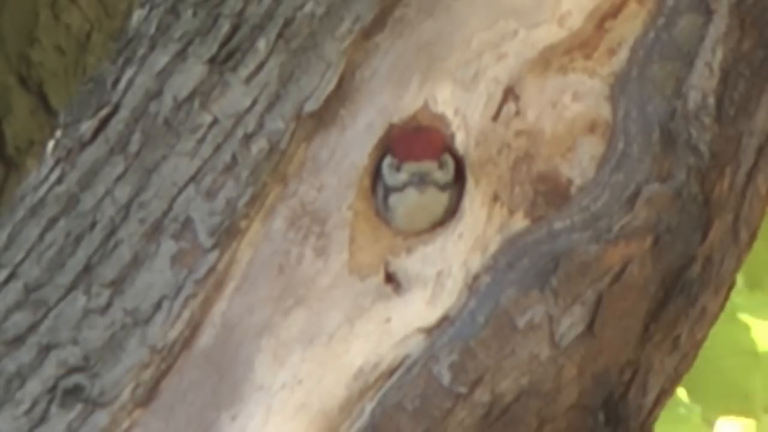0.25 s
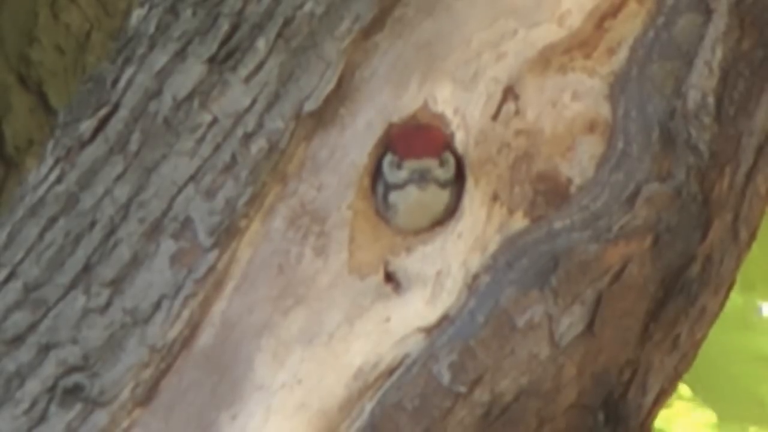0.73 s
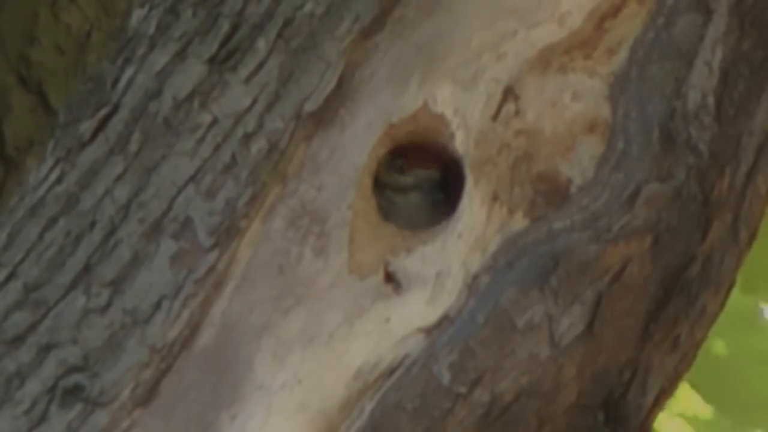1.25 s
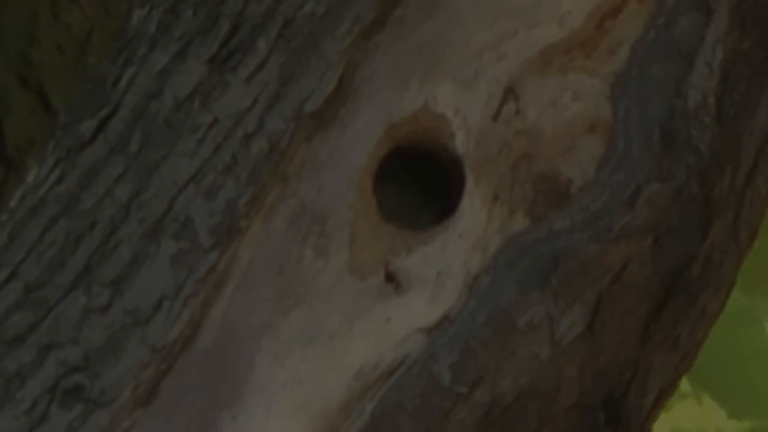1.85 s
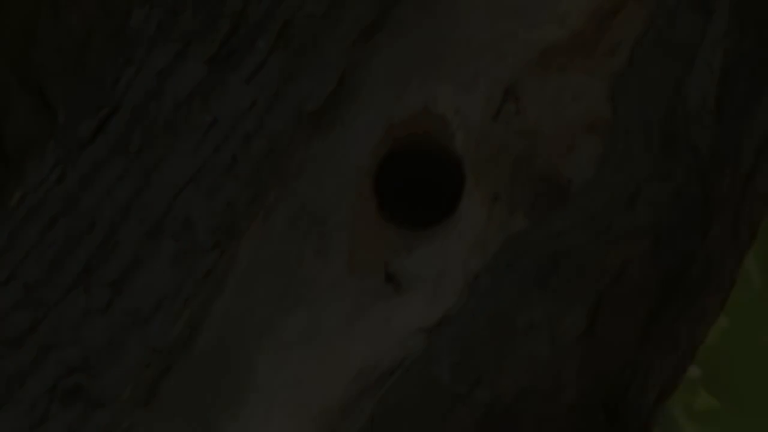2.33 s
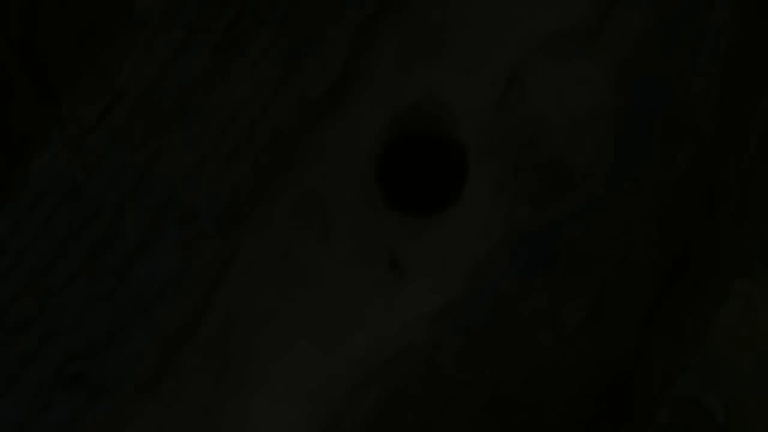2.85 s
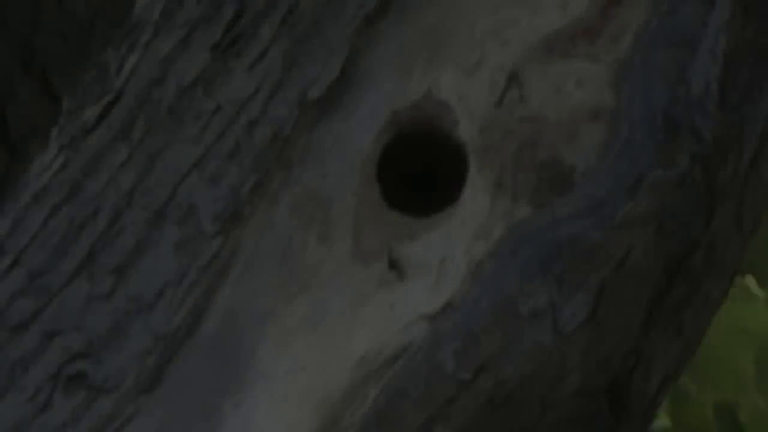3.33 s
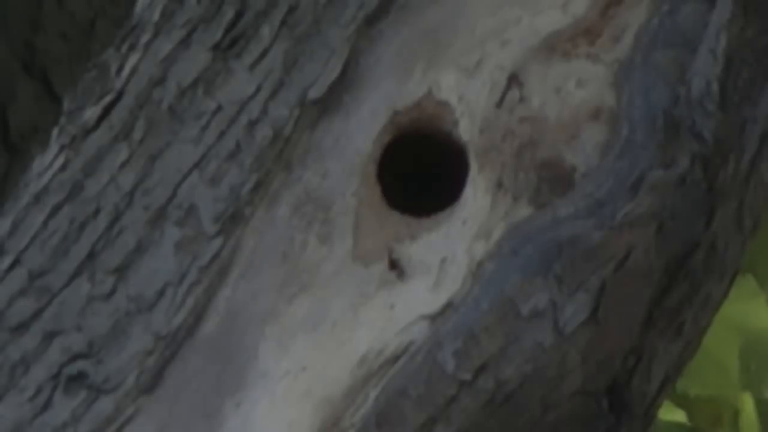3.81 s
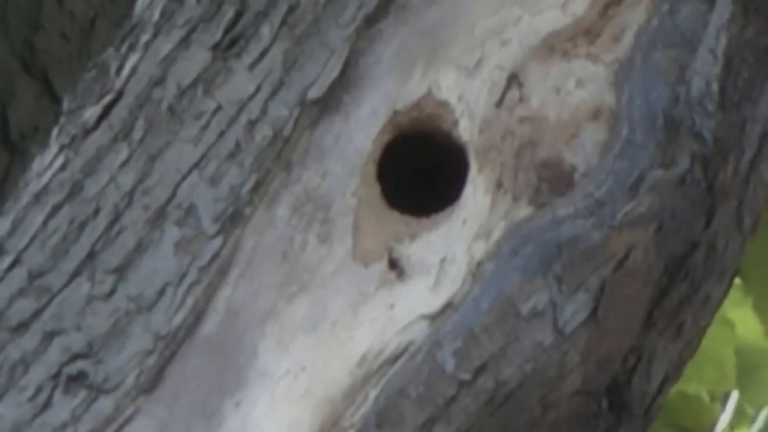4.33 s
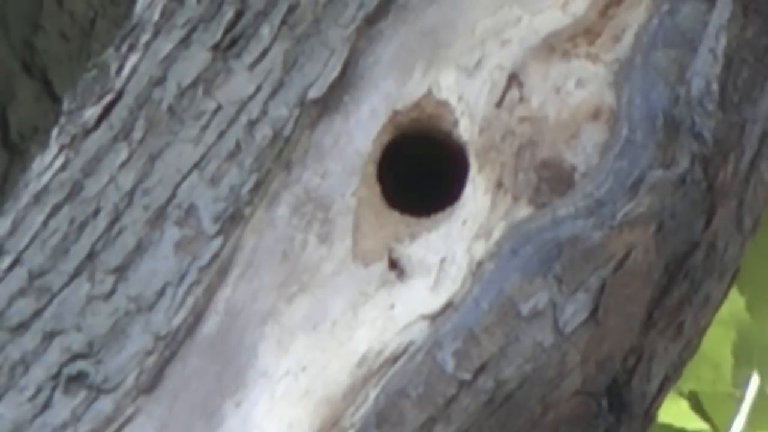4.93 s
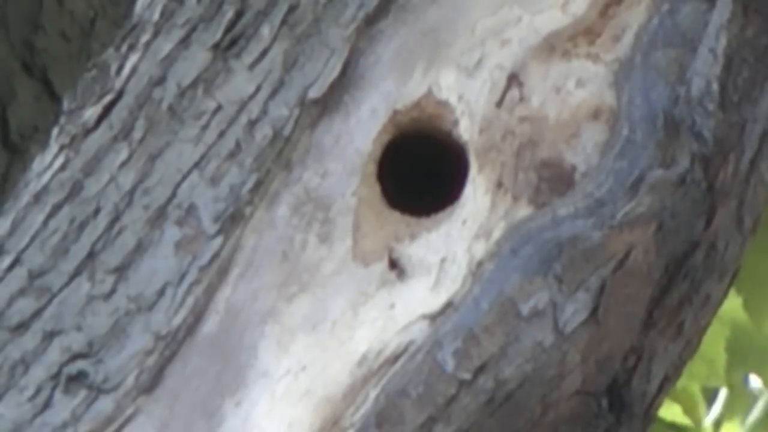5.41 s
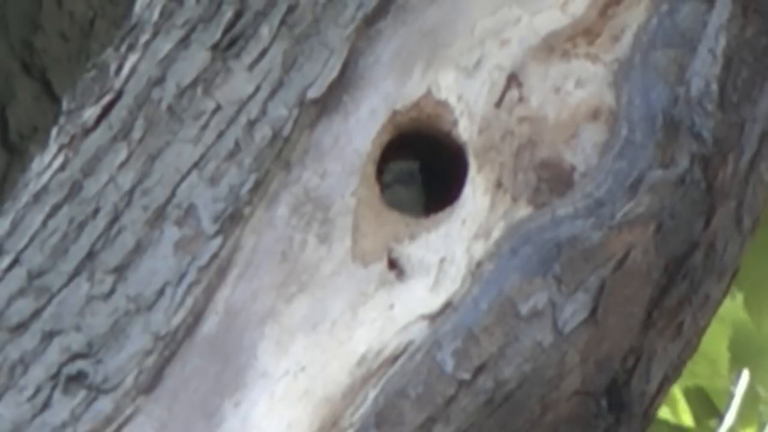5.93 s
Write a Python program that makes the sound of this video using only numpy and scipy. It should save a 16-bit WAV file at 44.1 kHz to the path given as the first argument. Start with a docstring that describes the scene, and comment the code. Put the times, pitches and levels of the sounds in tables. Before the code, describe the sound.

An echoing wood around a woodpecker nest hole, heard in stereo for about six seconds. At once a warbler repeats a rapid gliding phrase four times until 0.8 s, with mellow thrush whistles, quick chirps, trills and thin seeps near 0.7 and 0.9. The chick gives bright, raspy chips of about 30 milliseconds at 0.1, 1.0, 1.5, 1.6 and 2.0 s, each echoing briefly. Clear piping notes come at 1.4-1.8. Leaf hiss, far traffic and a faint low drone lie beneath, all fading gradually to silence at 2.8. A second shot then fades in without the drone: duller, deeper chips at 3.3, 4.1, 4.6 and 5.9, with very faint soft ones near 5.4 and 6.0. Thrush whistles cluster at 3.4-4.0 and 4.5-4.9, with sparse faint pipes after. Wind rumbles and flutters on the microphone, strongest from 3.7 to 5.4, with a low thump at 4.6, then eases.

```python
"""An echoing wood, at a nest hole: a woodpecker chick gives short arched calls, built from harmonics and breath
noise. Thrush whistles and small songbirds are gliding near-sine notes with a random-noise echo. Shaped noise
makes far traffic, leaves and wind rumbling in the microphone; a wavering sine drones low in the first shot.
Two shots follow each other: the first fades out, the second fades in."""
import sys
import numpy as np
from scipy import signal
from scipy.fft import rfft, irfft, next_fast_len
from scipy.io import wavfile
from scipy.ndimage import uniform_filter1d, map_coordinates

SR = 44100
rng = np.random.default_rng(int(sys.argv[2]) if len(sys.argv) > 2 else 0)


def dump(signal):
    """Clip the signal to [-1, 1] and save it as 16-bit WAV at the path in sys.argv[1]."""
    limited = np.clip(np.atleast_2d(signal).T, -1, 1)
    pcm = np.round(limited * 32767).astype(np.int16)
    wavfile.write(sys.argv[1], SR, pcm)


N = 271656
SHOT_CHANGE_S = 2.796


def amp(db):
    """dB to gain."""
    return 10 ** (np.asarray(db) / 20)


def unit(x):
    """Scaled to rms 1."""
    return x / np.sqrt(np.mean(x ** 2) + 1e-20)


def along(points, hz):
    """Interpolates (frequency [Hz], value) points on a log frequency axis."""
    point_hz, value = np.transpose(points)
    return np.interp(np.log(hz + 1), np.log(point_hz + 1), value)


def wobble(rate_hz, size=N):
    """Smooth random curve with rate_hz knots a second."""
    knots = rng.standard_normal(int(size * rate_hz / SR) + 4)
    return map_coordinates(knots, [np.arange(size) * rate_hz / SR])


def filtered(x, response):
    """Multiplies the spectrum of x by a response of frequency."""
    size = next_fast_len(N + 8192)  # zero padding keeps the end from wrapping round
    return irfft(rfft(x, size) * response(np.fft.rfftfreq(size, 1 / SR)), size)[..., :N]


def add(track, start_s, sound):
    """Mixes a sound into the track at start_s."""
    part = track[..., round(start_s * SR):][..., :sound.shape[-1]]
    part += sound[..., :part.shape[-1]]


def by_shot(first, second):
    """The first sound before the change of shot, the second after it."""
    return np.where(np.arange(N) < SHOT_CHANGE_S * SR, first, second)


def edges(size, attack_s):
    """Sine-squared start and end of a note."""
    t = np.arange(size) / SR
    return np.sin(np.pi / 2 * np.clip(np.minimum(t, t[::-1]) / attack_s, 0, 1)) ** 2


# decay of the echo among trunks: (frequency [Hz], t60 [s])
TREE_DECAY = [(1500, 0.54), (3000, 0.46), (6000, 0.49), (12000, 0.14)]


def trees(x, gap_s):
    """The wood's answer to a short sound: a new scatter of trunks each time, decaying by frequency."""
    hz, t, z = signal.stft(rng.standard_normal((2, SR // 2)), SR, nperseg=256)
    decay_db = -60 * t / along(TREE_DECAY, hz)[:, None]
    tail = signal.istft(z * amp(decay_db), SR, nperseg=256)[1]
    tail = tail[:1] + 0.43 * tail  # the near trunks are heard alike on both sides
    tail = tail / np.linalg.norm(tail[0])
    tail = np.pad(tail, ((0, 0), (round(gap_s * SR), 0)))
    return signal.fftconvolve(x[None], tail, axes=1)


def note(start_s, length_s, pitch_hz, shape_db, pan_db, echo_db, waver_hz, grain_db, trill=False):
    """Near-pure whistle gliding through three pitches and levels; a trill shakes regularly and pulses in level."""
    out = np.zeros((2, N))
    a_hz, b_hz, c_hz = pitch_hz
    size = round(length_s * SR)
    u = np.arange(size) / (length_s * SR)
    # parabola through the start, middle and end pitch
    hz = a_hz * (1 - u) * (1 - 2 * u) + 4 * b_hz * u * (1 - u) + c_hz * u * (2 * u - 1)
    trill_hz = 62 if b_hz < 3200 else 96  # the high singers trill faster
    beat = 2 * np.pi * u * length_s * trill_hz
    hz += waver_hz * (np.sin(beat) if trill else wobble(300, size))
    level_db = np.interp(u, [.1, .5, .9], shape_db)
    level_db += 1.17 * wobble(59.6, size) + grain_db * wobble(260, size)
    if trill:
        level_db += 4.4 * np.cos(beat)
    tone = amp(level_db) * np.sin(2 * np.pi * np.cumsum(hz) / SR) * edges(size, attack_s=0.0012)
    side = amp([[pan_db / 2], [-pan_db / 2]])
    add(out, start_s, tone * side)
    add(out, start_s, amp(echo_db) * trees(tone, gap_s=.006) * np.sqrt(side))
    return out


def rush(spectrum, alike, lean, patchy_db):
    """Stereo noise of rms 1 with patches of random gain, likeness of the sides and balance set by frequency."""
    z = signal.stft(rng.standard_normal((2, N)), nperseg=512)[2]
    field = uniform_filter1d(rng.standard_normal(z.shape[1:]), size=6, axis=0)
    field = uniform_filter1d(field, size=14, axis=1)
    pair = signal.istft(z * amp(patchy_db * unit(field)), nperseg=512)[1][:, :N]

    def mid_side(hz):
        turn = np.arccos(np.clip(along(alike, hz), -1, 1)) / 2
        return amp(along(spectrum, hz)) * [np.cos(turn), np.sin(turn)]

    mid, side = filtered(pair, mid_side)
    return unit(filtered([mid + side, mid - side], lambda hz: amp(along(lean, hz) * [[.5], [-.5]])))


# calls: (time [s], length [s], share of length before the top, top pitch [Hz], level [dB],
# brightness [dB per harmonic], echo [dB], row of VOICES)
CALLS = [(0.125, .036, 0.4, 2758, -34, -0.2, -4.5, 0), (0.998, .026, .48, 2722, -32, -1, -4, 0),
         (1.522, 0.023, .44, 2670, -33, 2, -9.5, 0), (1.587, 0.027, .4, 2410, -36.5, -3, -2.5, 0),
         (2.041, 0.027, .48, 2730, -39, 2, -8, 0), (2.444, .032, .55, 2520, -56, 4, -7, 2),
         (3.338, 0.036, .37, 2660, -38.5, -1, -1, 1), (4.06, 0.039, .33, 2700, -33.5, 1.5, -2, 1),
         (4.638, 0.032, .4, 2600, -36, 1.5, -2.5, 1), (5.39, .042, .46, 2500, -60, -6, -7, 2),
         (5.535, .048, .45, 2494, -56.5, -1.5, -10, 2), (5.852, 0.03, .5, 2780, -32.5, -0.1, -4, 1),
         (5.859, .04, .48, 2416, -59.5, 8.5, -3, 2), (6.013, .05, .48, 2496, -47.5, 0.7, -7.5, 2)]
# ways of calling, rows: at the mouth of the hole, deep in it, softer and flatter. Columns: (start pitch / top,
# end pitch / top, flatness of the top, attack [s], breath rasp [dB], echo gap [s], harmonics 1 to 5 [dB each])
VOICES = [(.6, 0.53, 2.3, 0.0016, -10, .016, -5, 0, -4.5, -4.5, -22),
          (.55, .51, 3.1, 0.0036, -5.5, .006, -0.4, 0.51, -10, -6, -17),
          (0.66, 0.74, 2.1, .008, -12, .012, -0.5, 0, 6.5, -4, -14)]
# colour of a call at the mouth of the hole: (frequency [Hz], level [dB])
THROAT_COLOUR = [(1200, 0), (2200, -5), (2800, 2.5), (3700, 2), (5400, 0), (7000, -2), (10000, -14),
                 (12500, -11.5), (15500, -22)]
# colour of a call from deep in the hole: (frequency [Hz], level [dB])
HOLE_COLOUR = [(1200, -15.5), (2200, -8.5), (2800, -1.5), (3700, -1.5), (4600, -7.5), (5400, -14),
               (7000, -11.5), (8000, -29), (15000, -35.5)]


def chick():
    """Harmonics whose pitch shoots up, levels off and drops, with a rasp of breath and the wood's echo."""
    out = np.zeros((2, N))
    for start_s, length_s, crest, top_hz, level_db, bright_db, echo_db, voice in CALLS:
        deep = round(voice) == 1
        colour = HOLE_COLOUR if deep else THROAT_COLOUR
        start, end, bend, attack_s, rasp_db, gap_s, *harmonics_db = VOICES[round(voice)]
        size = round(length_s * SR)
        u = np.arange(size) / (length_s * SR)

        # pitch arch: both distances are 0 at the top
        rise = np.clip(1 - u / crest, 0, 1)
        fall = np.clip((u - crest) / (1 - crest), 0, 1)
        hz = top_hz * (1 - (1 - start) * rise ** bend - (1 - end) * fall ** bend)
        phase = 2 * np.pi * np.cumsum(hz + 25 * wobble(510, size)) / SR

        shaky_db = 2.1 if deep else 1.4
        call = np.zeros(size)
        for k, db in enumerate(harmonics_db, 1):
            harmonic_db = db + (bright_db - 1.3 * fall) * (k - 2) + along(colour, k * hz)
            harmonic_db += shaky_db * k ** 0.81 * wobble(345, size)  # higher harmonics flicker more
            call += amp(harmonic_db) * np.sin(k * phase)

        air = rfft(rng.standard_normal(size)) * amp(along(colour, np.fft.rfftfreq(size, 1 / SR)))
        bursts = amp(8.5 * np.tanh(wobble(307, size)))  # uneven pulses
        roughness = 0.3 + rise + fall  # least at the top of the arch
        call += amp(rasp_db) * unit(irfft(air, size)) * roughness * bursts
        call *= edges(size, attack_s) * amp(level_db - 3.9 * u)  # the push of breath weakens

        add(out, start_s, call * amp([[-.6], [.6]]))
        blur = 0.53 + 0.99 * wobble(896, size)  # moving leaves blur the pitch of the echo
        add(out, start_s, amp(echo_db) * trees(call * blur, gap_s) * amp([[-1.5], [1.5]]))
        add(out, start_s + .046, amp(echo_db - 17) * call * amp([[-2.5], [2.5]]))  # one distinct echo
    return out


# (time [s], length [s], start pitch [Hz], middle pitch [Hz], end pitch [Hz], level [dB], echo [dB])
WHISTLE_NOTES = [(0, 0.031, 2030, 2070, 2290, -50, 3), (0.043, 0.074, 2300, 2520, 2240, -43.5, -4),
                 (0.345, 0.098, 2143, 2135, 1995, -48.5, -4), (0.444, 0.15, 2133, 2052, 2006, -47.5, -2.5),
                 (0.601, 0.17, 2000, 1905, 1635, -50, -5), (0.85, 0.079, 2500, 2440, 2394, -43, -10),
                 (3.358, 0.23, 1873, 1908, 1904, -52.5, -8), (3.707, 0.092, 2110, 2030, 2080, -52, 1),
                 (3.808, 0.029, 2520, 2980, 2930, -53, -5), (3.843, 0.049, 2900, 2780, 2720, -45.5, -4.5),
                 (3.951, .14, 2300, 2220, 1770, -47, -4.5), (4.485, 0.08, 2080, 2100, 1930, -46.5, -10),
                 (4.562, .078, 1850, 2075, 1890, -49, 3.5), (4.735, 0.16, 2597, 2310, 2166, -45, -6)]


def thrush_whistles():
    """Nearly steady whistles that bend through three pitches."""
    out = np.zeros((2, N))
    for start_s, length_s, *pitch_hz, db, echo_db in WHISTLE_NOTES:
        out += note(start_s, length_s, pitch_hz, (db - .3, db, db - 0.5), pan_db=6.5, echo_db=echo_db,
                    waver_hz=20, grain_db=1.1)
    return out


# repeats of the phrase: (time [s], level [dB])
PHRASE_STARTS = [(.17, -44), (.317, -44), (0.472, -42.5), (.625, -44)]
# one phrase: (time after its start [s], length [s], start pitch [Hz], middle pitch [Hz], end pitch [Hz],
# start level [dB re phrase], middle level [dB re phrase], end level [dB re phrase])
PHRASE_SYLLABLES = [(0, .012, 4220, 4230, 4170, 5, -0.5, 3), (.001, .029, 4380, 3550, 2420, -3.5, -6.5, 6),
                    (.014, .017, 3330, 3710, 4150, -3, -10, -7),
                    (0.026, 0.023, 2790, 3290, 3460, -2, 3.5, -4.5),
                    (0.065, .031, 2050, 2650, 2120, -2, 2.5, -0.5),
                    (.09, .019, 3200, 3950, 4430, 2.5, -7, -7.5)]


def warbler():
    """One phrase of quick glides repeated, each syllable a little higher or lower every time."""
    out = np.zeros((2, N))
    for start_s, db in PHRASE_STARTS:
        for after_s, length_s, *rest in PHRASE_SYLLABLES:
            pitch_hz = np.array(rest[:3]) * rng.normal(1, 0.011)
            out += note(start_s + after_s, length_s, pitch_hz, db + np.array(rest[3:]), pan_db=-7.0,
                        echo_db=-8.0, waver_hz=45.2, grain_db=3.0)
    return out


# (time [s], length [s], start pitch [Hz], end pitch [Hz], level [dB])
CHIRP_NOTES = [(0.005, 0.027, 5380, 4300, -39.5), (0.037, .02, 3330, 4260, -40.5),
               (0.056, 0.045, 3780, 2500, -43), (0.1, .018, 3230, 4230, -42),
               (0.402, 0.02, 4570, 5500, -43), (0.783, 0.023, 2960, 3930, -44),
               (0.85, 0.02, 3300, 3880, -40), (1.06, .015, 4270, 4930, -52),
               (1.138, .027, 3090, 2470, -48.5), (1.29, 0.024, 2810, 4060, -44.5),
               (1.321, 0.023, 3340, 2580, -49), (1.395, 0.022, 3130, 4040, -50),
               (1.455, .013, 4560, 5000, -44), (1.7, .02, 2920, 3300, -49), (1.764, 0.015, 4100, 4940, -47),
               (1.8, .09, 6900, 7800, -61), (1.86, .02, 2820, 4120, -52), (1.912, .025, 3930, 4930, -43),
               (2.02, .012, 2600, 4000, -46), (2.074, 0.015, 3310, 5120, -43),
               (2.184, 0.016, 2830, 3740, -46), (2.24, .018, 3720, 5050, -41),
               (3.652, 0.033, 3720, 4460, -57), (4.016, 0.036, 5330, 5060, -54),
               (5.685, .023, 5480, 6400, -55)]


def chirps():
    """Quick glides of small birds that cover most of their pitch range in the first half."""
    out = np.zeros((2, N))
    for start_s, length_s, a_hz, c_hz, db in CHIRP_NOTES:
        early_share = .74 if c_hz > a_hz else 0.62
        b_hz = a_hz + (c_hz - a_hz) * early_share
        out += note(start_s, length_s, (a_hz, b_hz, c_hz), (db - 1.0, db, db - 1.0), pan_db=-6.0,
                    echo_db=-4, waver_hz=40, grain_db=4)
    return out


# (time [s], length [s], start pitch [Hz], end pitch [Hz], level [dB], left over right [dB])
TRILL_NOTES = [(0.62, 0.092, 5510, 3830, -48.5, -7), (0.683, 0.048, 4040, 3900, -61, -9),
               (0.724, 0.079, 3910, 3650, -56.5, -7), (0.812, 0.036, 5500, 4080, -42.5, -3),
               (0.862, 0.031, 4350, 4500, -45, -16), (0.925, 0.067, 2765, 2574, -49, -10),
               (2.245, 0.043, 6400, 6520, -54, -5), (3.889, .061, 2820, 2810, -55, -13),
               (4.212, .15, 2417, 2250, -51, 4), (4.384, .08, 2240, 2260, -63, -16),
               (4.899, 0.16, 2250, 2350, -58, -7), (5.028, 0.054, 6270, 6170, -65, 0)]


def trills():
    """Straight glides with a regular shake in pitch and level."""
    out = np.zeros((2, N))
    for start_s, length_s, a_hz, c_hz, db, pan_db in TRILL_NOTES:
        out += note(start_s, length_s, (a_hz, (a_hz + c_hz) / 2, c_hz), (db + 0.5, db, db + .3), pan_db,
                    echo_db=-0.1, waver_hz=225, grain_db=1.0, trill=True)
    return out


# (time [s], length [s], pitch [Hz], level [dB], swell from start to end [dB])
PIPE_NOTES = [(1.438, 0.074, 4233, -40, 7), (1.53, 0.041, 4180, -41, -4), (1.695, 0.085, 4200, -36.5, 4),
              (1.79, .075, 4060, -54, 3), (1.895, 0.063, 7900, -56, -1), (2.322, .05, 6400, -50, -6),
              (3.422, 0.053, 5900, -51.5, 4), (3.957, .02, 6320, -59, 3), (5.325, .11, 5960, -60, -13),
              (5.574, .11, 6130, -63.5, 13), (5.718, 0.075, 6060, -60, -1.5),
              (6.072, 0.081, 5060, -56, -10)]


def pipes():
    """Held piping notes that sag slightly in pitch."""
    out = np.zeros((2, N))
    for start_s, length_s, hz, db, swell_db in PIPE_NOTES:
        shape_db = (db - 5.0 - swell_db / 2, db, db - 3.5 + swell_db / 2)
        out += note(start_s, length_s, (1.01 * hz, hz, .985 * hz), shape_db, pan_db=-6.0, echo_db=-6,
                    waver_hz=29.7, grain_db=1.0)
    return out


# (time [s], middle pitch [Hz], level [dB], echo [dB])
SEEP_NOTES = [(.73, 8020, -44, 0), (.923, 7900, -41.5, -2), (3.836, 7820, -52, 9.5),
              (4.465, 8050, -59, 7.5), (4.735, 7750, -56.5, 6.5)]


def seeps():
    """Thin high calls that dip in pitch."""
    out = np.zeros((2, N))
    for start_s, hz, db, echo_db in SEEP_NOTES:
        out += note(start_s, 0.0385, (1.13 * hz, hz, 1.045 * hz), (db - 8.5, db, db - 13), pan_db=-10.5,
                    echo_db=echo_db, waver_hz=39.6, grain_db=1.5)
    return out


# (time [s], end level [dB])
COO_NOTES = [(2.831, -55.5), (3.25, -56.5)]


def coos():
    """Low hoots on one pitch, loudest at the start."""
    out = np.zeros((2, N))
    for start_s, db in COO_NOTES:
        out += note(start_s, 0.25, [481] * 3, (db + 9, db - 4.5, db), pan_db=1, echo_db=1.5,
                    waver_hz=33.4, grain_db=4.2)
    return out


def songbirds():
    """All the birds around the chick."""
    return thrush_whistles() + warbler() + chirps() + trills() + pipes() + seeps() + coos()


# one spectrum per shot: (frequency [Hz], density [dB per Hz])
WOOD_SPECTRA = [
    [(65, -30.5), (110, -10), (189, -7), (252, -5), (577, -3), (640, -0.5), (929, -3), (1770, -13.5),
     (2790, -12.5), (4300, -11.5), (7080, -17.5), (11900, -34), (14300, -34.5), (15600, -40)],
    [(65, -44), (110, -5.5), (222, -9.5), (310, -7.5), (373, -7.5), (414, -5), (725, -2), (1120, -5),
     (2620, -18.5), (6250, -21.5), (8890, -33), (14300, -39), (15600, -46)],
]
# one level per shot: (rms [dB])
WOOD_LEVELS = [-42.5, -44]
# one curve per shot: (frequency [Hz], left-right likeness [correlation])
WOOD_ALIKE = [
    [(60, 0.58), (150, 0.23), (380, 0.8), (950, 0.24), (2380, 0.36), (5980, 0.69), (15000, 0.67)],
    [(60, 0.82), (150, 0.28), (380, 0.66), (950, 0.78), (2380, 0.58), (5980, 0.87), (15000, 0.83)],
]
# one curve per shot: (frequency [Hz], left over right [dB])
WOOD_LEAN = [
    [(60, 7.5), (150, -2.5), (380, 2.5), (950, 6), (2380, -4.0), (5980, -4.5), (15000, -2.5)],
    [(60, -8.5), (150, -4), (380, 1), (950, 7.5), (2380, 0), (5980, -3), (15000, -0.5)],
]


def wood():
    """Slightly patchy broad noise: far traffic in the low part, leaves and distant song in the high part."""
    shots = [amp(db) * rush(spectrum, alike, lean, patchy_db=0.86)
             for db, spectrum, alike, lean in zip(WOOD_LEVELS, WOOD_SPECTRA, WOOD_ALIKE, WOOD_LEAN)]
    return by_shot(*shots)


# (time [s], rumble level [dB])
WIND_LEVEL = [(0, -56.5), (.1, -50.5), (.3, -52.5), (.62, -50), (.9, -46.5), (1.05, -49.5), (1.35, -47),
              (1.8, -51), (2.03, -45.5), (2.6, -49), (2.85, -42.5), (3.03, -51), (3.22, -41.5), (3.51, -46),
              (3.69, -38), (3.96, -42.5), (4.14, -34.5), (4.38, -43), (4.65, -42), (4.8, -34), (5.04, -39),
              (5.4, -39), (5.55, -48), (5.8, -49.5), (5.94, -52.5), (6.12, -54.5)]
# one spectrum per shot: (frequency [Hz], density [dB per Hz])
RUMBLE_SPECTRA = [
    [(13, -42), (22, 0.5), (38, -31), (59, -3), (75, 4), (85, -2.5), (140, -19), (180, -39), (310, -120)],
    [(13, -43), (22, -9), (38, -10), (61, -3.5), (75, -1), (95, -3), (130, -20.5), (140, -24), (180, -47),
     (310, -120)],
]
# edges of gusts: (frequency [Hz], density [dB per Hz])
FLUTTER_SPECTRUM = [(60, -41), (100, -19.5), (150, 4), (220, 0.5), (320, -9), (500, -28), (900, -120)]


def wind():
    """Near-mono rumble of air on the microphone; strong gusts add lumpy, fluttering edges."""
    level_db = np.interp(np.arange(N) / SR, *np.transpose(WIND_LEVEL))
    rumble_alike = [(30, 0.76), (70, 1.0), (130, 1.0)]
    rumble = by_shot(*[rush(spectrum, rumble_alike, [(60, 0.61)], patchy_db=0.0)
                       for spectrum in RUMBLE_SPECTRA])
    lumps = amp(3.5 * wobble(30))
    flutter = unit(lumps * rush(FLUTTER_SPECTRUM, [(130, .4), (300, .1)], [(200, 8.9)], patchy_db=2.0))
    flutter_db = 1.54 * (level_db + 41.5) - 51.5  # grows faster than the rumble
    return amp(level_db + 1.1 * wobble(11)) * rumble + amp(flutter_db) * flutter


# single pushes of air: (time [s], peak [dB], frequency [Hz])
AIR_PUSHES = [(1.224, -30.5, 83), (3.224, -30, 79), (4.6, -30, 95)]


def thumps():
    """Pushes of air that stand out of the wind: cosines under a short Gaussian."""
    out = np.zeros((2, N))
    t = np.arange(-SR // 20, SR // 20) / SR
    for peak_s, db, hz in AIR_PUSHES:
        add(out, peak_s - .05, amp(db) * np.cos(2 * np.pi * hz * t) * np.exp(-(t / 0.0085) ** 2))
    return out


# low drone: (pitch [Hz], waver [Hz], rms [dB])
DRONE = (55, 6.7, -62)


def hum():
    """Low sine, unsteady in pitch and level, perhaps a far engine; first shot only."""
    hz, waver_hz, db = DRONE
    phase = 2 * np.pi * np.cumsum(hz + waver_hz * wobble(4.6)) / SR
    tone = np.sin(phase) * amp(5.5 * wobble(8.2))
    return by_shot(amp(db) * unit(tone), 0)


def scene():
    """Everything at the tree."""
    return chick() + songbirds() + wood() + wind() + thumps() + hum()


# the two microphone ports: (frequency [Hz], phase by which left leads [rad])
PORT_PHASE = [(0, -0.1), (1460, -0.57), (9040, -0.58), (14600, -0.3), (15200, 0.7)]


def record(dry):
    """Fades out and in around the change of shot, offsets the ports in phase and limits the band."""
    fade_s, fade_power, top_hz = 2.147, 1.03, 15710
    fade = np.clip(abs(np.arange(N) / SR - SHOT_CHANGE_S) / fade_s, 0, 1) ** fade_power

    def microphone(hz):
        ports = np.exp(1j * along(PORT_PHASE, hz) * np.array([[.5], [-.5]]))
        return ports * (hz < top_hz)

    return filtered(dry * fade, microphone)


dry = scene()
out = record(dry)
dump(out)
```